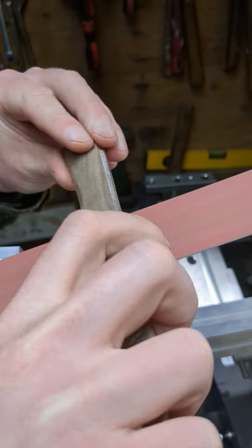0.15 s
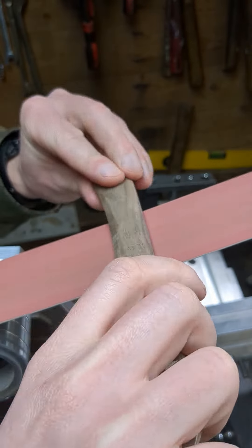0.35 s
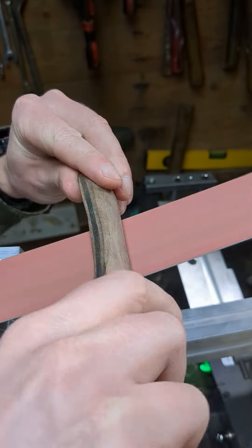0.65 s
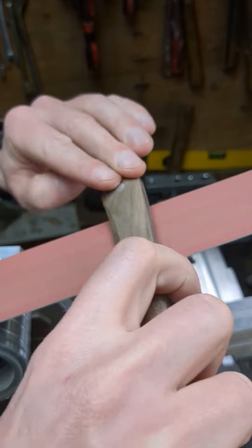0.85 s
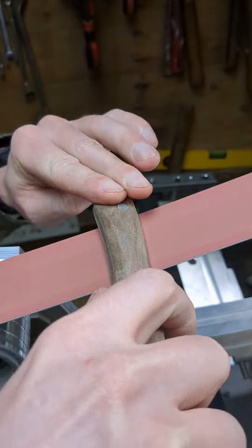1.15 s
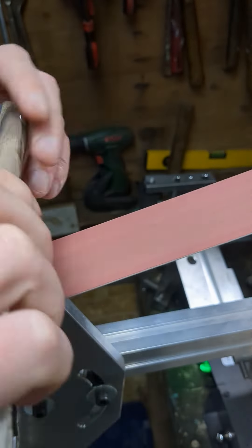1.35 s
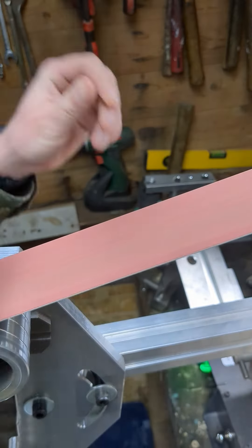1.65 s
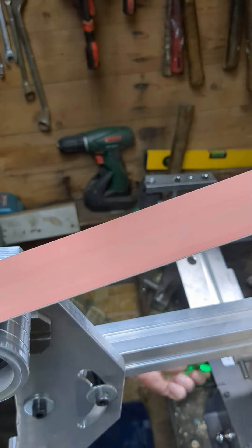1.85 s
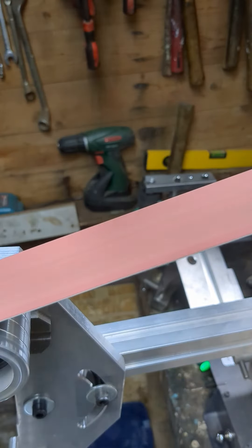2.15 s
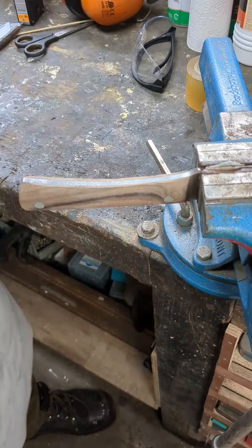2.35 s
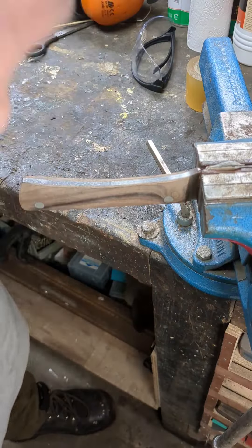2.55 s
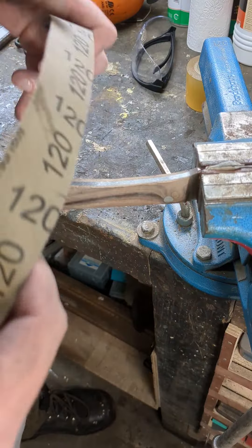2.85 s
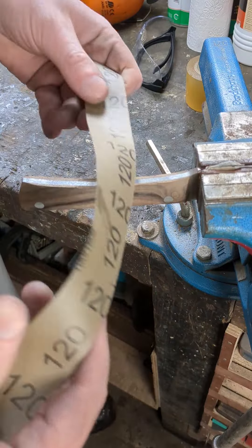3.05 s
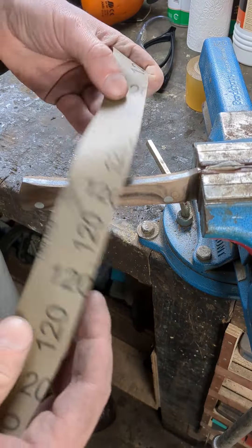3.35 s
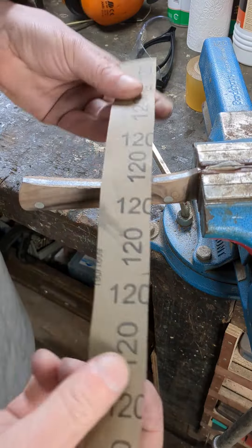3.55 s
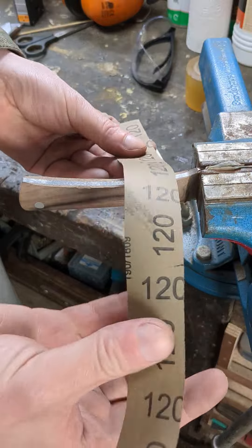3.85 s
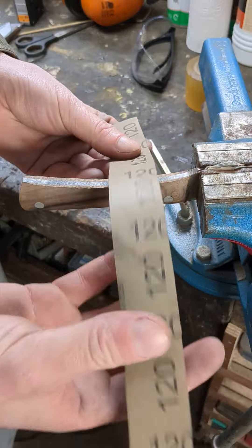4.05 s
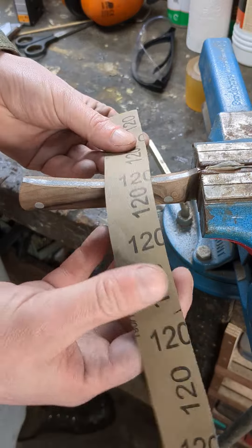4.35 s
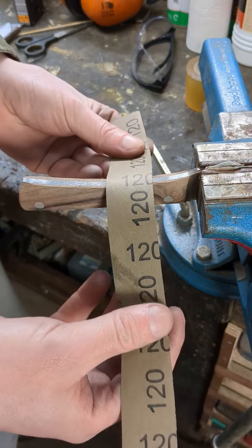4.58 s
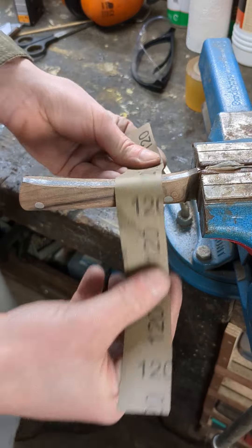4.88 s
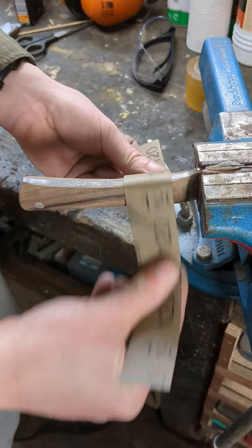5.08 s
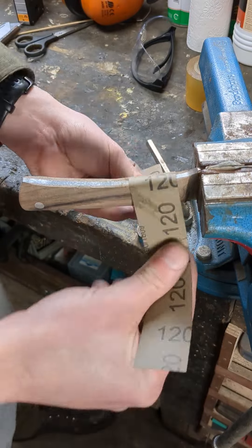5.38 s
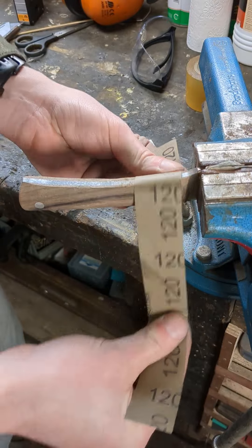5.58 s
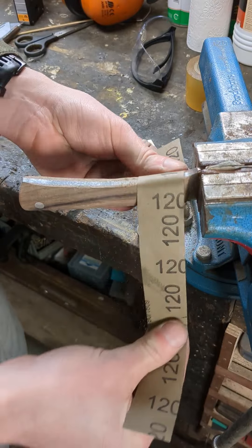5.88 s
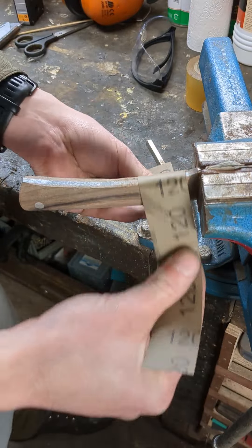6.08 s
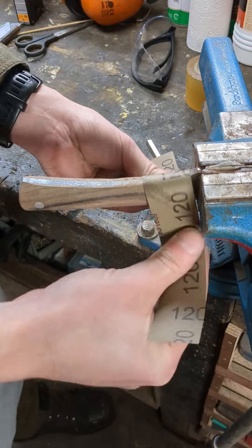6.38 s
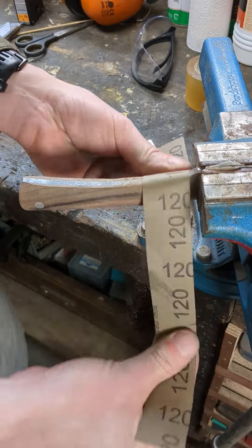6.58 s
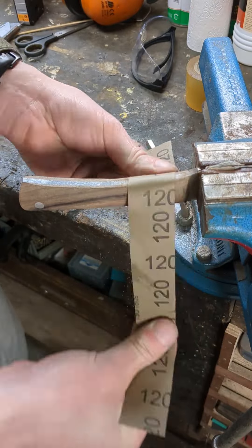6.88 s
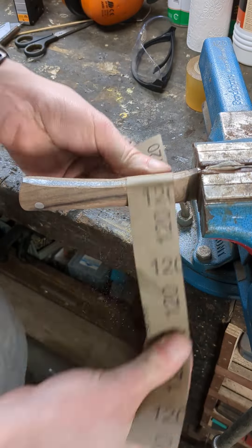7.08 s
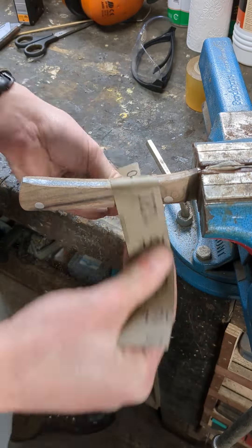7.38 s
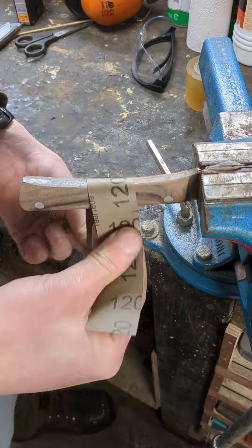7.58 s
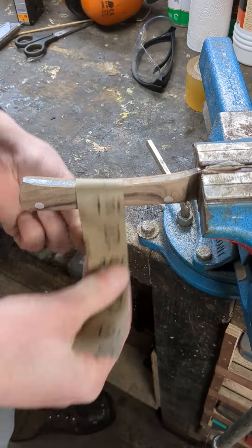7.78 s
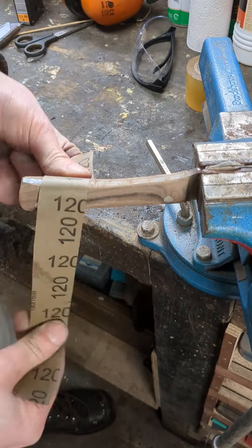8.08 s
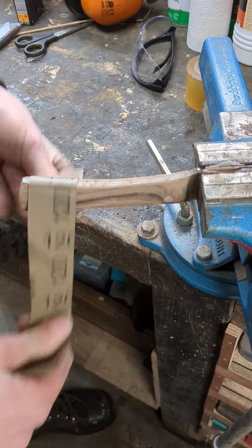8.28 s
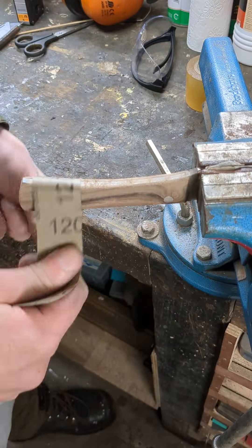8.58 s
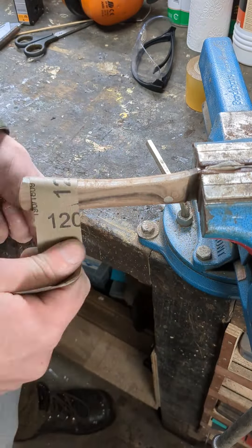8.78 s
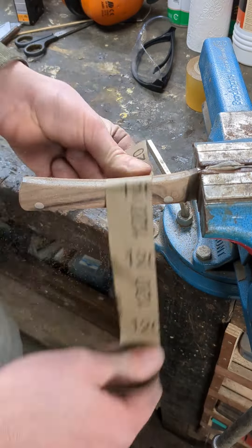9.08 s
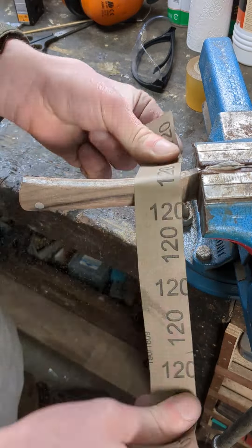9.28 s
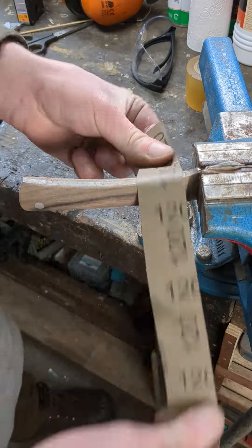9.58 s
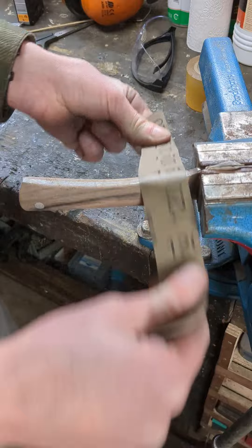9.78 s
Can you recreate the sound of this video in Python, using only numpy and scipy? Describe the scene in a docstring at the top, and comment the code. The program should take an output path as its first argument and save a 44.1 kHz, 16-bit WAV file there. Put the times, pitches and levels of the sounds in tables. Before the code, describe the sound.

Close stereo pickup of tool work: loud belt grinder noise, brightened three times by wood pressed on the grit, then a sudden cut to near silence with faint low rumble. Stiff sandpaper crackles and ticks irregularly as it is handled. Ten or so distinct back-and-forth sanding strokes follow, dry hiss over hollow wooden drumming, before the rhythm turns into a rapid, lighter, continuous scrubbing to the end.

```python
"""A belt grinder roars in a workshop: coloured hiss with frame resonances, and a brighter hiss at each of three
touches of a wooden handle on the belt, when gain control ducks the roar. After a cut, a quiet room: an abrasive
strip rustles in the hands (noise gestures) among short bright clicks (noise puffs), then is pulled to and fro over
the handle in a vice, slowly, then in quick short strokes: hiss that follows the strip's speed, over drumming wood.
A pair of microphone ports hears it all, with low room rumble and faint air behind the hand work."""
import sys
import numpy as np
from scipy import signal
from scipy.fft import rfft, irfft, next_fast_len
from scipy.io import wavfile
from scipy.ndimage import uniform_filter1d

SR = 44100
rng = np.random.default_rng(int(sys.argv[2]) if len(sys.argv) > 2 else 0)


def pcm_store(signal):
    """Save signal as 16-bit PCM."""
    levels = np.round(np.clip(np.atleast_2d(signal), -1, 1) * 32767)
    wavfile.write(sys.argv[1], SR, levels.astype(np.int16).T)


N = 437913
T, SIZE = np.arange(N) / SR, next_fast_len(N)
HZ = np.fft.rfftfreq(SIZE, 1 / SR)

# Table levels are nominal: trims, flicker and gain control come after them.
# Likeness of the grinder at the two ports: freq_hz, likeness (0-1)
ROAR_LIKENESS = [(30, .8), (60, .6), (300, 0.29), (700, 0.13), (1400, 0.056), (15000, .02)]
# Likeness of the strip and the vice at the two ports: freq_hz, likeness (0-1)
STRIP_LIKENESS = [(100, 1), (700, 0.77), (1400, 0.39), (4000, 0.41), (8000, 0.043), (15000, 0.083)]
# Modes of the wooden handle: freq_hz, width_hz, lift_db
HANDLE_MODES = [(1704, 97, 7.5), (388, 91, 4), (214, 31, 6)]
PORT_LAG_S = 0.00015  # the right port hears the sanding strip later


def amp(db):
    """Decibels to gain."""
    return 10 ** (np.asarray(db) / 20)


def evened(x):
    """Scales to unit rms."""
    return x / np.sqrt(np.mean(x ** 2) + 1e-20)


def read(points):
    """Reads a (freq_hz, value) table on the frequency grid, along log frequency."""
    hz, value = np.transpose(points)
    return np.interp(np.log(HZ + 1), np.log(hz + 1), value)


def lift(modes):
    """Resonance bumps in dB."""
    return sum(db / (1 + (2 * (HZ - hz) / width) ** 2) for hz, width, db in modes)


def filtered(x, gain):
    """Zero-phase colouring."""
    return irfft(rfft(x, SIZE) * gain, SIZE)[..., :N]


def wander(hz):
    """Slow chance of unit rms, mostly below hz."""
    return evened(filtered(rng.standard_normal(N), 1 / (1 + (HZ / hz) ** 4)))


def hiss(colour_db, likeness, lag_s=0., grit_db=0.):
    """Dense grit of uneven size at two ports: one part shared and delayed, one part the right port's own."""
    grains = rng.standard_normal((2, N)) * amp(grit_db * rng.standard_normal(N))
    left, own = rfft(grains, SIZE)
    share = np.clip(read(likeness), 0, 1)
    delayed = left * np.exp(-2j * np.pi * HZ * lag_s)
    right = share * delayed + np.sqrt(1 - share ** 2) * own
    return evened(irfft(np.array([left, right]) * amp(colour_db), SIZE)[:, :N])


def panned(x, pan_db):
    """Leans a pair left (positive) or right (negative)."""
    return x * amp([[.5], [-.5]] * np.atleast_1d(pan_db))


def resonate(x, hz, width):
    """A resonance that follows the curve hz: shift down, smooth, shift back."""
    turn = np.exp(2j * np.pi * np.cumsum(hz) / SR)
    keep = np.exp(-np.pi * width / SR)
    return 2 * (turn * signal.lfilter([1 - keep], [1, -keep], x / turn)).real


def gesture(start, end, db, rise_db, fall_db):
    """A level in dB that climbs to the start, holds, and falls after the end, at rates per second."""
    return db - rise_db * np.maximum(start - T, 0) - fall_db * np.maximum(T - end, 0)


def belt_roar():
    """Motor, wheels and belt: a steady broad noise lifted at the resonances of the frame."""
    # Motor, wheels and belt: freq_hz, density_db (per Hz)
    roar_colour = [(25, -31), (100, -21.5), (180, -6.5), (340, -8.5), (900, -5.5), (1400, -5.5), (2600, -4),
                   (3900, -4.5), (5600, -11), (7800, -8), (10400, -12), (12000, -10), (14000, -17.5),
                   (15500, -18.5)]
    # Resonances of the grinder frame: freq_hz, width_hz, lift_db
    frame_modes = [(194, 68, 3), (258, 12, 7.5), (484, 60, 8.5), (667, 75, 5.5), (991, 63, 7.5),
                   (1262, 55, 10), (1576, 70, 7.5), (2104, 170, 4.5), (2716, 25, 6.5)]
    level_db = -17 + 2.2 * wander(hz=12.)
    return amp(level_db) * hiss(read(roar_colour) + lift(frame_modes), ROAR_LIKENESS)


def wood_on_belt():
    """Belt grit cuts the wood: a bright hiss, loud while the handle presses on the belt."""
    # Belt grit on wood: freq_hz, density_db (per Hz)
    cutting_colour = [(300, -31), (1000, -12), (2000, -5.5), (3800, 2.5), (5500, -3.5), (7500, -2.5),
                      (9500, 0.5), (12500, -2), (14000, -10), (15500, -10.5)]
    # The handle is laid on the belt: start_s, end_s, level_db
    touches = [(-.2, 0.103, -12), (.42, 0.721, -12), (1.018, 1.31, -11.5)]
    land_db_per_s, lift_db_per_s = 150, 599.5
    ease_db, free_belt_db = 1.5, -32  # the grip eases mid-touch; hiss of the untouched belt
    presses_db = []
    for start, end, db in touches:
        ease = np.sin(np.pi * np.clip((T - start) / (end - start), 0, 1))
        presses_db.append(gesture(start, end, db - ease_db * ease, land_db_per_s, lift_db_per_s))
    press_db = np.maximum(free_belt_db, np.max(presses_db, axis=0))
    return amp(press_db + 1.0 * wander(hz=25.)) * hiss(read(cutting_colour), ROAR_LIKENESS)


def grinder():
    """Frame roar and cutting hiss together, until the cut to the quiet room."""
    cut_s = 2.345
    running = np.clip((cut_s - T) / 0.00067, 0, 1)
    wisp = amp(-15.5 - 1400 * np.abs(T - cut_s)) * (1 - running)  # a faint wisp outlasts the cut
    return (panned(belt_roar(), pan_db=-0.9) + panned(wood_on_belt(), pan_db=5.0)) * (running + wisp)


def stroke_motion():
    """The strip speeds up and slows between turns of the hands: level, progress, quick, tilt and drum curves."""
    # One row a stroke, from one turn of the hands to the next; pull and push take turns: start_s, peak_db
    strokes = [(4.821, -32), (5.068, -24.5), (5.273, -24.5), (5.439, -25), (5.602, -26), (5.767, -26.5),
               (5.944, -29.5), (6.114, -28.5), (6.303, -28), (6.472, -26), (6.649, -24), (6.829, -31),
               (6.857, -30.5), (6.923, -30), (6.976, -30.5), (7.033, -30.3), (7.088, -30.5), (7.138, -29.5),
               (7.193, -29.5), (7.244, -30.5), (7.302, -28.5), (7.357, -30), (7.411, -30.3), (7.463, -29),
               (7.523, -27), (7.576, -29.5), (7.629, -29), (7.687, -29.5), (7.737, -28.5), (7.792, -29.5),
               (7.851, -28.5), (7.904, -29.5), (7.961, -28.5), (8.017, -31), (8.072, -29), (8.127, -30.6),
               (8.18, -29.9), (8.237, -30), (8.292, -29.5), (8.346, -30.6), (8.402, -27.6), (8.454, -28.1),
               (8.505, -29.5), (8.559, -30.5), (8.612, -28), (8.668, -28.5), (8.721, -28), (8.775, -29),
               (8.83, -29.9), (8.886, -29.5), (8.937, -29.5), (8.993, -31), (9.049, -28), (9.104, -30),
               (9.159, -31), (9.213, -27.5), (9.265, -28.5), (9.316, -28.5), (9.372, -28), (9.426, -27.5),
               (9.477, -30), (9.532, -29.5), (9.586, -31.5), (9.642, -28.5), (9.699, -31.5), (9.751, -32),
               (9.803, -32.5), (9.854, -31.5), (9.91, -29.9)]
    # Rows slow pull, slow push, quick pull, quick push: turn_db (hiss left at the turn before it, below the peak),
    # peak_place (0-1 of the movement), pause_s (before the next turn), drum_db (drumming over the mean),
    # tilt_db (upper over lower paper ring)
    kinds = [(-44, 0.61, 0.026, 0.1, 5), (-26, 0.59, 0.044, 0.1, -1), (-15, 0.55, 0.0036, -2, 0.5),
             (-17, 0.48, 0.0064, 1, -1.1)]
    # The strip travels along the handle; far from the vice the wood drums more; the hiss left at the turns
    # rises and falls: time_s, drum_db, turn_db (hiss added at the turns)
    travel = [(4.82, -9.5, 17), (5.3, -16, -1), (6.2, -14, -8), (6.65, -22.5, 7), (6.83, -17.5, -9),
              (7.0, -21.5, 0), (7.25, -20, 17), (7.55, -17, -19), (8.05, -15.5, -10), (8.5, -17.5, -10),
              (8.9, -18.5, 8), (9.2, -24, 15), (9.6, -22.5, 17.5), (9.8, -21.5, 19)]
    quick_s = 6.855  # the quick strokes start
    start, peak_db = np.transpose(strokes)
    brisk = start > quick_s - .04  # the last slow stroke is already cut short
    kind = 2 * brisk + (np.arange(len(start)) + brisk) % 2
    turn_db, place, pause, drum_db, tilt_db = np.array(kinds)[kind].T
    at, wood_db, added_db = np.transpose(travel)
    turn_db = turn_db + peak_db + np.interp(start, at, added_db)
    drum_db = drum_db + np.interp(start, at, wood_db)
    tilt_db = tilt_db + 0.5 * rng.standard_normal(len(start))  # no two strokes ring quite alike

    k = np.clip(np.searchsorted(start, T) - 1, 0, len(start) - 1)  # the stroke under way
    end = np.append(start[1:], 2 * start[-1] - start[-2])
    progress = np.clip((T - start[k]) / (end - start - pause)[k], 0, 1)
    quick = T > quick_s
    bend = (np.log(.5) / np.log(place))[k]  # puts the peak speed at its place
    edge = np.where(quick, 1, 0.87)  # the smaller, the more abruptly a stroke starts and stops
    speed = np.abs(np.sin(np.pi * progress ** bend)) ** edge
    # The strip bites as it starts
    speed = speed * amp(np.where(quick, 3.0 * (.5 - progress), 1.15 * np.exp(-progress / 0.35)))
    at_turns = amp(np.interp(T, start, turn_db) - 13.0)
    level = (at_turns + amp(peak_db[k] + 4.0) * speed) * (T > start[0])
    level = level * amp(0.89 * wander(hz=89.0))  # the grit catches and lets go
    return level, progress, quick, uniform_filter1d(tilt_db[k], size=400), drum_db[k]


def strip_grit(progress, quick, tilt_db, drum_db):
    """Grit on wood: hiss coloured by the handle and by the two ringing free lengths of the strip."""
    # Slow strokes: freq_hz, density_db (per Hz)
    slow_colour = [(530, -26), (900, -15.5), (1570, -8), (1700, -4.5), (1830, -3), (2830, -3.5), (3820, -1),
                   (4520, 3), (5610, -4), (7400, 0), (8870, -3.5), (12400, -2), (16000, -16.5)]
    # Quick strokes: freq_hz, density_db (per Hz)
    quick_colour = [(530, -37), (900, -21.5), (1550, -10), (1720, -6), (1920, -5.5), (4200, 2), (5610, -3),
                    (6890, 2), (10500, 0), (11800, 2.5), (14000, -6.5), (15200, -7), (16000, -5.5)]
    # Handle mode in the quick strokes, a slight ring: freq_hz, width_hz, lift_db
    quick_modes = [(1724, 70, 2)]
    # The two free lengths of the strip: freq_hz, width_hz
    paper_bands = [(4500, 1300), (7200, 1900)]
    slow = hiss(read(slow_colour) + lift(HANDLE_MODES), STRIP_LIKENESS, PORT_LAG_S, grit_db=0.8)
    fast = hiss(read(quick_colour) + lift(quick_modes), STRIP_LIKENESS, PORT_LAG_S, grit_db=0.8)
    grit = np.where(quick, fast, slow)
    for (hz, width), sign in zip(paper_bands, (-.5, .5)):  # pull and push favour one free length or the other
        ring_db = 1.3 * sign * tilt_db + 0.85 * wander(hz=30.)
        ring_db = ring_db + 1.3 * (progress - .5)  # the strip rings more as it tightens
        grit = grit + (amp(ring_db) - 1) * filtered(grit, np.exp(-((HZ - hz) / width) ** 2))
    # The wood colours the hiss
    mean_drum_db = np.where(quick, -20.5, -16.5)
    wood_db = 0.64 * (uniform_filter1d(drum_db, size=6000) - mean_drum_db) + 1.33 * wander(hz=5.5)
    return grit + (amp(wood_db) - 1) * filtered(grit, np.exp(-((HZ - 2100.) / 2400.0) ** 2))


def handle_drumming(level, progress, quick, tilt_db, drum_db):
    """The strokes shake the handle, the strip's free end flaps, and the heavy vice and bench ring on."""
    # The handle shaken in the vice: freq_hz, density_db (per Hz)
    drum_colour = [(41, -43), (70, -27), (96, -22), (206, -3), (276, -7), (380, 0.5), (741, -2.5),
                   (842, -1), (1500, -7.5), (1950, -26), (3300, -120)]
    # The free end of the strip flaps lower as it lengthens: start_hz, end_hz, width_hz, level_db
    flaps = [(1497, 723, 110, 1.5), (518, 220, 57, -5.5)]
    # Vice and bench: freq_hz, density_db (per Hz)
    vice_colour = [(70, -32), (130, -5), (210, -0.5), (300, -12), (420, 2.5), (560, -5), (800, -18.5)]
    drum = hiss(read(drum_colour) + lift(HANDLE_MODES), STRIP_LIKENESS, PORT_LAG_S, grit_db=0.5)
    shake = hiss(0 * HZ, STRIP_LIKENESS, PORT_LAG_S)
    for start_hz, end_hz, width, db in flaps:
        flap = evened(resonate(shake, start_hz + (end_hz - start_hz) * progress, width))
        flap_db = db - 1.2 * tilt_db - 4.4 * quick  # stronger on the duller of the two directions
        flap_db = flap_db + 13 * (progress - .5)  # the longer the free end, the louder it flaps
        drum = drum + amp(flap_db) * flap
    # Strongest as the strip bites
    jolt = level * amp(uniform_filter1d(drum_db - 15.0 * (progress - .45), size=200))
    keep = np.exp(-1 / (0.095 * SR))
    ringing = np.sqrt(signal.lfilter([1 - keep], [1, -keep], jolt ** 2))  # rings on through the turns
    vice = ringing * amp(-9.5) * hiss(read(vice_colour), STRIP_LIKENESS)
    return jolt * amp(3.1 * wander(hz=58.3) - 6.5) * drum + vice


def sanding():
    """Grit hisses with the speed of the strip, which stops short of each turn, and the wood drums under it."""
    level, *motion = stroke_motion()
    grit = level * strip_grit(*motion)
    return panned(grit, pan_db=0.4) + panned(handle_drumming(level, *motion), pan_db=1.5)


def strip_rustle():
    """The strip slides through the fingers: soft clumpy noise with its own treble level in each slide."""
    # Slides: start_s, length_s, level_db, swell_db (reached at the end), treble_db (relative to the rest)
    slides = [(2.564, .02, -71, -1, 0.1), (2.648, .02, -69, -1, 0.1), (2.7, .04, -70, -2, -9),
              (2.783, 0.067, -58, -9, -12), (3.003, 0.13, -61, -8, -3), (3.2, .09, -80, 5, -10),
              (3.341, .04, -53, -2, -7), (3.384, 0.041, -49, -5, 2), (3.444, 0.071, -62, 8.5, 7),
              (3.55, 0.029, -71, 8, 8), (3.664, 0.081, -59, -13, 7.5), (4.018, .015, -74, -3, 4),
              (4.181, .015, -75, -1, -5), (4.41, .02, -75, -1, -3), (4.488, 0.07, -74.5, 4, -1),
              (4.63, 0.1, -61.5, -5, 4), (4.774, 0.062, -51, -6, 6)]
    # Rustling paper: freq_hz, density_db (per Hz)
    rustle_colour = [(290, -32), (500, -8), (761, -18.5), (1420, -13.5), (1900, -11), (4400, -4),
                     (5550, -14), (7310, -8.5), (12000, -11), (16000, -22)]
    rise_db_per_s, stop_db_per_s, treble_hz = 900, 600, 6500
    slide_levels = []
    for start, length, db, swell_db, _ in slides:
        swollen_db = db + swell_db * np.clip((T - start) / length, 0, 1)
        slide_levels.append(amp(gesture(start, start + length, swollen_db, rise_db_per_s, stop_db_per_s)))
    held = amp(-90) * (T > 2.4) * (T < 4.84)  # the strip held still before the sanding
    level = held + np.sum(slide_levels, axis=0)
    treble_level = held + amp(np.transpose(slides)[-1]) @ np.array(slide_levels)
    crackle = 1 + 1.6 * np.maximum(wander(hz=300.) - 1.2, 0)
    paper = hiss(read(rustle_colour), STRIP_LIKENESS, grit_db=4.5)
    low = filtered(paper, 1 / (1 + (HZ / treble_hz) ** 4))
    return (level * low + treble_level * (paper - low)) * crackle * amp(1.5 * wander(hz=60.))


def short_clicks():
    """Short bright clicks, the later ones during the slow strokes: puffs of noise around one pitch that die fast."""
    # Clicks: start_s, peak_db, pitch_hz, t60_s
    clicks = [(2.439, -46, 1600, 0.034), (2.775, -42, 3460, 0.074), (2.927, -52, 1550, .05),
              (3.066, -31, 7800, 0.036), (3.086, -35.5, 8270, 0.054), (3.161, -35, 2900, 0.018),
              (3.308, -47, 5000, .04), (3.349, -23, 4300, 0.046), (3.377, -37, 4380, 0.049),
              (3.518, -32, 6000, 0.036), (3.594, -40, 1500, 0.028), (3.651, -32, 3100, 0.14),
              (3.867, -28, 5500, 0.038), (3.877, -34, 6540, 0.048), (4.016, -51, 11000, .08),
              (4.112, -40, 2800, 0.053), (4.281, -50.5, 2100, 0.044), (4.377, -50, 2000, .05),
              (4.44, -44.5, 2710, 0.054), (4.766, -26, 8000, 0.072), (4.778, -31, 4200, 0.077),
              (5.604, -29, 9000, .02), (5.875, -15, 9000, .008), (6.31, -17, 9000, .06),
              (6.66, -29, 8000, .03), (6.84, -34, 8190, .04)]
    size, rise_s, bend = 8192, 0.0039, 1.12  # a bend over 1: holds a moment, then dies ever faster
    t, hz = np.arange(size) / SR, np.fft.rfftfreq(size, 1 / SR)
    out = np.zeros((2, N))
    for start, db, pitch, t60 in clicks:
        octaves = np.log2((hz + 1) / pitch)
        colour = np.exp(-octaves ** 2 / np.where(octaves < 0, 3.5, 2.5))
        colour = colour + 0.33 * (hz > 200) * (octaves < 0)  # body below the pitch
        colour = colour + 0.88 * np.exp(-(octaves / 0.3) ** 2)  # narrow peak at the pitch
        noise = rng.standard_normal((2, size))
        noise = noise + 0.16 * noise[::-1]  # each port hears a little of the other
        puff = evened(irfft(rfft(noise) * colour))
        decay = amp(db - 11.0 - 60 * (t / t60) ** bend)
        first = round(start * SR)
        out[:, first:first + size] += puff * decay * np.minimum(t / rise_s, 1)
    return out


def rustle_and_clicks():
    """The rustle of the strip in the hands and the short bright clicks, leaning left together."""
    return panned(strip_rustle() + short_clicks(), pan_db=1.5)


def room_reflections(x):
    """A short cluttered tail of sparse taps, other ones at each port."""
    t = np.arange(9000) / SR
    sparse = rng.choice([-1., 1.], (2, 9000)) * (rng.random((2, 9000)) < .05)
    taps = sparse * amp(-60 * t / 0.17) * (t > .004)
    return signal.fftconvolve(x, taps / np.linalg.norm(taps[0]), axes=1)[:, :N]


def room_tone():
    """A lumpy low rumble over faint, flickering air."""
    # Room background: freq_hz, density_db (per Hz)
    room_colour = [(15, -9), (35, 2.5), (66, 0.5), (110, -6.5), (160, -16.5), (240, -13.5), (480, -20),
                   (730, -22), (1100, -32), (2600, -40.5), (6000, -48.5), (16000, -58.5)]
    # Course of the background: time_s, rumble_db, air_db
    room_levels = [(2.385, -100, -100), (2.4, -54, -56), (3.4, -60, -59.5), (4.0, -62.5, -65.5),
                   (4.7, -60, -58), (5.2, -63, -55), (6.85, -57, -60.5), (6.88, -71, -70), (8.9, -73, -77),
                   (9.93, -80, -71)]
    # Likeness of the room at the two ports: freq_hz, likeness (0-1)
    room_likeness = [(30, 1), (100, 0.36), (240, .7), (950, .35), (4000, .15)]
    at, *levels = np.transpose(room_levels)
    rumble_db, air_db = (np.interp(T, at, db, left=-120) for db in levels)
    tone = hiss(read(room_colour), room_likeness)
    rumble = filtered(tone, 1 / (1 + (HZ / 150.) ** 4))
    lumpy = rumble * amp(3.5 * wander(hz=22.) - 1)
    air = (tone - rumble) * amp(2.5 * wander(hz=14.) + 0.1)
    return panned(amp(rumble_db) * lumpy + amp(air_db) * air, pan_db=2.0)


def scene():
    """Grinder, then the hand work in its room."""
    strokes, paper = sanding(), rustle_and_clicks()
    reflections = room_reflections(amp(-11) * strokes + amp(-19) * paper)
    return grinder() + strokes + paper + reflections + room_tone()


def record(dry):
    """Gain control turns loud sound down, by a little more than its excess; then the band limit."""
    power = abs(uniform_filter1d((dry ** 2).mean(0), size=1500))
    over_db = np.maximum(10 * np.log10(power + 1e-12) + 17.5, 0)
    held = dry / amp(1.17 * uniform_filter1d(over_db, size=500))
    lowpass = signal.firwin(1023, 15800, window=("kaiser", 9), fs=SR)  # edge in Hz
    return signal.oaconvolve(held, lowpass[None], "same")


dry = scene()
out = record(dry)
pcm_store(out)
```